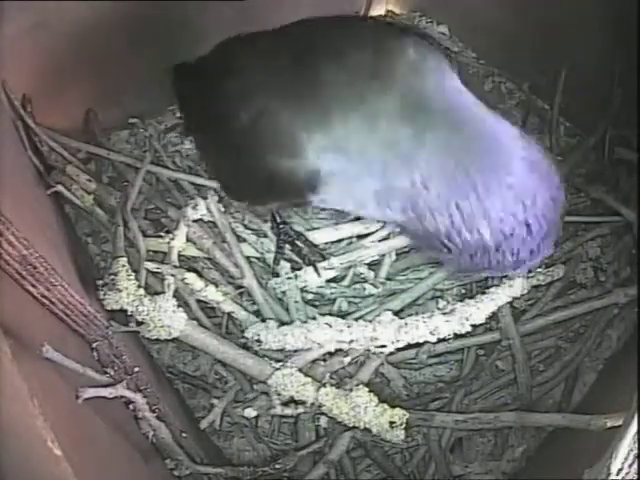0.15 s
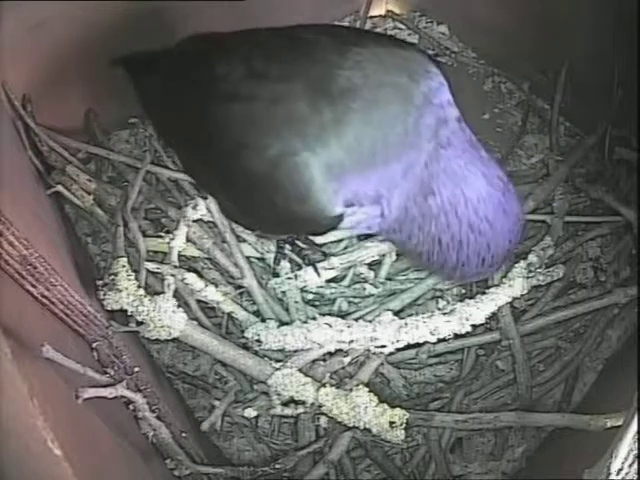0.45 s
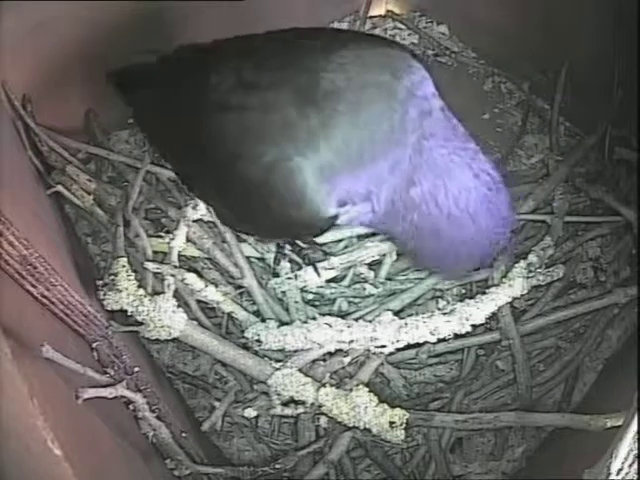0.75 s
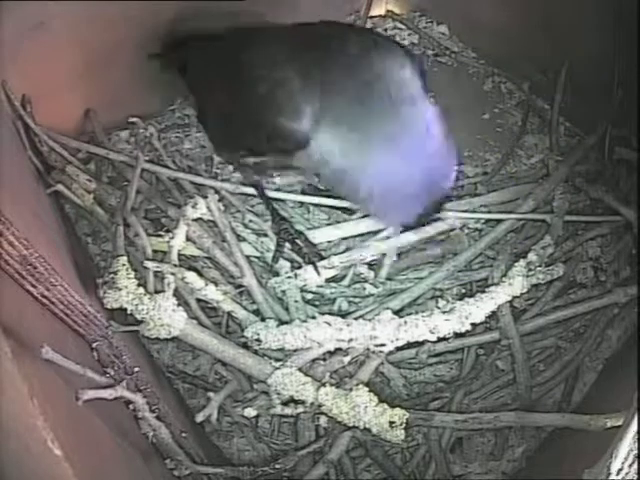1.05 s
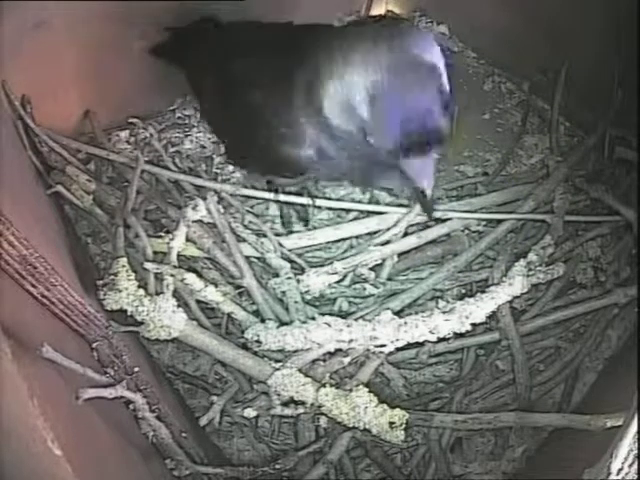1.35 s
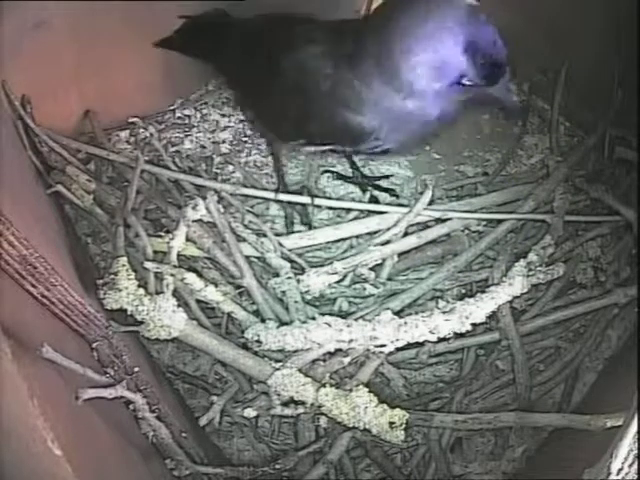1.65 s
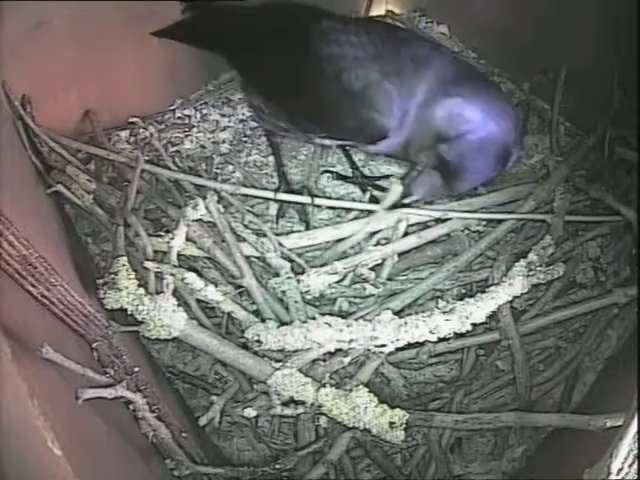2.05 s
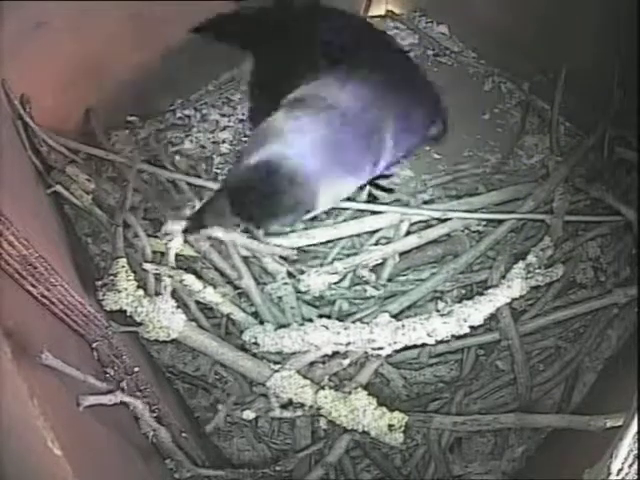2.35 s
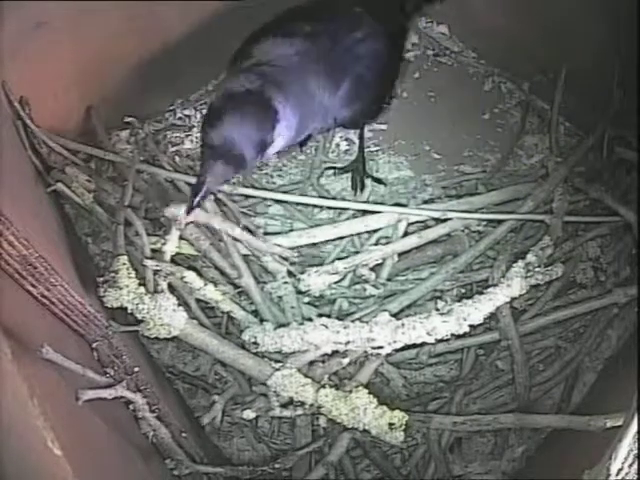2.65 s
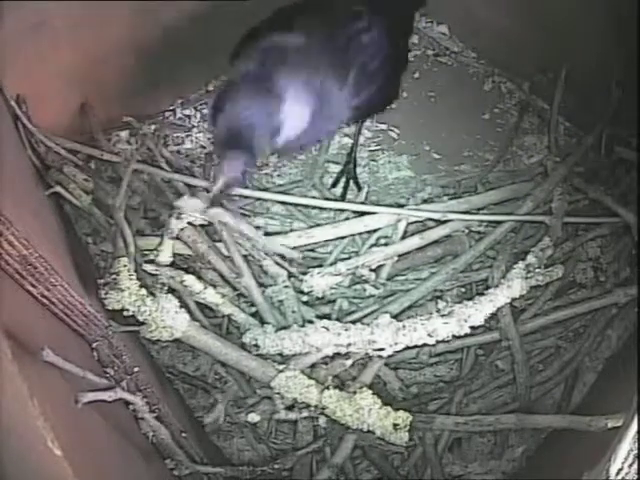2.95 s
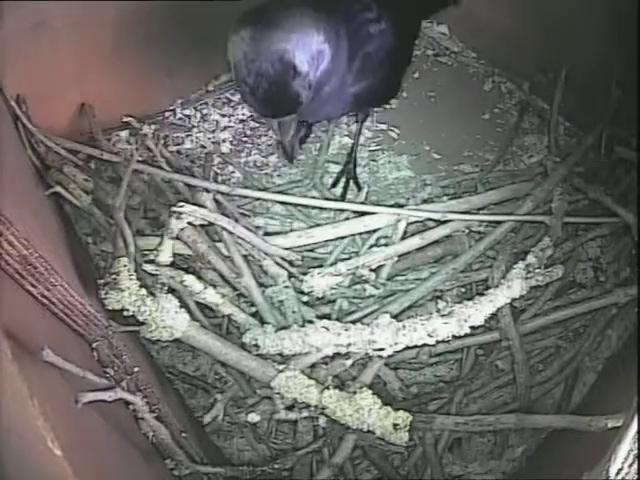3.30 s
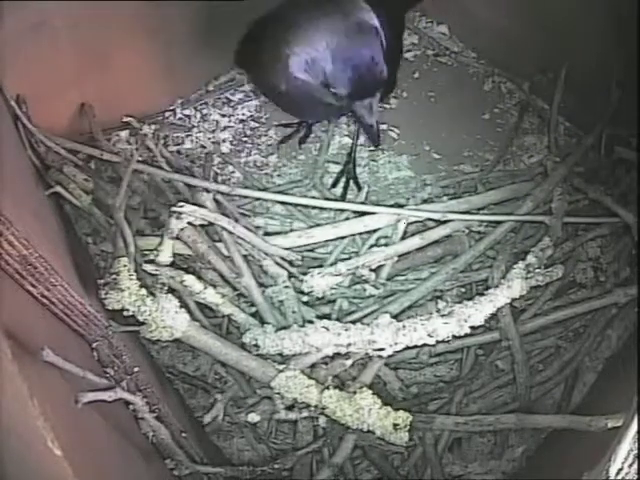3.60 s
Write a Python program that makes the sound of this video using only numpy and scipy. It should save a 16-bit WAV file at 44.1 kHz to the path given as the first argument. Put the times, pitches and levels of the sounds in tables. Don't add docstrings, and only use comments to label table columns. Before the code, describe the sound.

A bird shifts dry twigs in a wooden nest box, with clicks and knocks over a low hum

```python
import sys
import numpy as np
from scipy import signal
from scipy.fft import rfft, irfft
from scipy.io import wavfile
from scipy.ndimage import uniform_filter1d

SR = 44100
rng = np.random.default_rng(int(sys.argv[2]) if len(sys.argv) > 2 else 0)


def persist_wave(psi):
    counts = np.round(np.clip(psi, -1, 1) * 32767).astype(np.int16)
    wavfile.write(sys.argv[1], SR, np.atleast_2d(counts).T)


def amplitude_ratio(level_db):
    exponent = np.asarray(level_db, float) / 20
    return 10 ** exponent


N = 164493

HUM_HZ = 55.333
KINK_RAD = 1.135

# pitch in Hz, level in dB, t60 in seconds.
BOX = [(110, -8, .06), (220, -9.5, .05), (328, 9.5, 0.12), (480, 5, 0.11), (659, 3.5, 0.048),
       (808, -8, 0.19), (975, -2.5, 0.017), (1140, -1.5, 0.024), (1404, -5, 0.015), (1605, -7, 0.031),
       (1837, -4, 0.029), (2090, -8.5, 0.066), (2700, -17, 0.003)]
# frequency in Hz, level in dB per Hz.
CRACKLE = [(1000, -2.5), (2200, 1.5), (3200, -5), (4500, -7.5), (6200, -1.5), (7700, -4.5), (8800, -15)]


def rms_one(x):
    return x / np.sqrt(np.mean(x ** 2) + 1e-20)


def colour(x, points):
    hz, db = np.transpose(points)
    f = np.fft.rfftfreq(len(x), 1 / SR)
    gain = amplitude_ratio(np.interp(np.log(f + 1), np.log(hz), db))
    return irfft(rfft(x) * gain, len(x))


def drift(rate):
    points_per_s = 60
    count = int(N / SR * points_per_s) + 2
    smooth = uniform_filter1d(rng.standard_normal(count), max(1, int(30 / rate)))
    return np.interp(np.arange(N) / SR * points_per_s, np.arange(count), rms_one(smooth))


def ring(x, hz, t60):
    r = amplitude_ratio(-60 / (t60 * SR))
    w = 2 * np.pi * hz / SR
    gain = np.sin(w) * np.sqrt(2 * (1 - r * r))
    return signal.lfilter([0, gain], [1, -2 * r * np.cos(w), r * r], x + 1e-18)


def stroke(s, length, attack, release):
    t = np.arange(N) / SR - s
    return np.clip(t / attack, 0, 1) * np.exp(-np.maximum(t - length, 0) / release)


def air():
    # frequency in Hz, level in dB per Hz.
    air_colour = [(75, -0.5), (105, -9), (140, -11), (350, -25.5), (520, -27.5), (2100, -36.5), (2600, -43),
                  (8400, -49)]
    air_db, boxed_db, patchy_db = -52, -70.5, 3.5
    rumble_cut = signal.butter(2, 45, "high", fs=SR, output="sos")
    outside = rms_one(colour(signal.sosfilt(rumble_cut, rng.standard_normal(N)), air_colour))
    white = rng.standard_normal(N)
    boxed = np.zeros(N)
    for k, (hz, db, t60) in enumerate(BOX[3:]):
        patchy = amplitude_ratio(db + patchy_db * drift(15))
        boxed += (-1) ** k * patchy * ring(white, hz, t60)
    return amplitude_ratio(air_db) * outside + amplitude_ratio(boxed_db) * rms_one(boxed)


def cycle():
    repeats = [.10522, 2.58728]
    repeat_len_s, start_rad = .00803, -.49
    t = np.arange(N) / SR
    return start_rad + 2 * np.pi * HUM_HZ * (t - repeat_len_s * np.searchsorted(repeats, t))


def hum():
    # multiple of the supply frequency, peak level in dB.
    partials = [(2, -53), (3, -37), (4, -56.5), (5, -46), (6, -67.5), (7, -64.5), (8, -74.5), (9, -60),
                (10, -95), (11, -68.5), (12, -79.5), (13, -68), (14, -78.5), (15, -69.5), (17, -75),
                (18, -87.5), (19, -75), (21, -82.5), (23, -76), (27, -86), (31, -80)]
    core_lead = {1: 0, 2: 1.55, 3: .6}
    turn = cycle()
    out = amplitude_ratio(-25.3) * np.cos(turn)
    for k, db in partials:
        k = round(k)
        lead = core_lead.get(k, np.pi * k - KINK_RAD * k)
        out = out + amplitude_ratio(db) * np.cos(k * turn + lead)
    return out


def sparks():
    level_db, spread_db, decay_s = -67, 3.5, .0008
    turns = (cycle() - np.pi - KINK_RAD + 0.24) / (2 * np.pi) + 2
    size = amplitude_ratio(level_db + spread_db * rng.standard_normal(int(N / SR * HUM_HZ) + 10))
    fall = np.exp(-(turns % 1) / HUM_HZ / decay_s)
    return size[turns.astype(int)] * fall * rms_one(colour(rng.standard_normal(N), CRACKLE))


def tones(rows, width_t60, soft_s):
    t, out = np.arange(N) / SR, 0
    for s, db, length, hz in rows:
        sine = np.sin(2 * np.pi * hz * t)
        rough = ring(rng.standard_normal(N), hz, width_t60)
        out = out + amplitude_ratio(db) * stroke(s, length, soft_s, soft_s / 2) * (1.2 * sine + .2 * rough)
    return out


def whistles():
    # start in seconds, level in dB, length in seconds, pitch in Hz.
    calls = [
        (1.84, -84, .07, 4285),
        (2.24, -78.5, .1, 4277),
    ]
    return tones(calls, .1, .04)


def creaks():
    # start in seconds, level in dB, length in seconds, pitch in Hz.
    bends = [
        (2.987, -49.5, .028, 785),
        (3.105, -60, .025, 800),
        (3.138, -57, .018, 810),
        (3.16, -54, .02, 810),
        (.33, -74, .09, 1370),
    ]
    return tones(bends, .08, .012)


def damped_modes(rows):
    contact_cycles = 1.2
    age, out = np.arange(SR // 4) / SR, np.zeros(N)
    for s, db, hz, t60 in rows:
        level = amplitude_ratio(db - 60 * age / t60) * np.clip(age * hz / contact_cycles, 0, 1)
        start = int(s * SR)
        out[start:start + len(age)] += level * np.sin(2 * np.pi * hz * age + rng.uniform(0, 2 * np.pi))
    return out


def thumps():
    # start in seconds, peak level in dB, pitch in Hz, t60 in seconds.
    landings = [(.485, -61, 110, 0.1), (1.111, -58, 110, 0.1), (1.111, -40.5, 224, 0.1),
                (1.456, -47, 331, 0.14), (1.715, -37.5, 109, 0.13), (1.717, -34.5, 206, .08),
                (2.67, -31.5, 110, 0.15), (2.668, -28.5, 224, 0.084), (2.67, -31, 368, 0.048),
                (2.892, -31, 110, 0.14), (2.898, -35, 220, 0.12)]
    return damped_modes(landings)


def knocks():
    # start in seconds, peak level in dB, pitch in Hz, t60 in seconds.
    taps = [(.532, -62, 1196, .04), (.807, -42, 656, .06), (.809, -47.5, 1010, .03),
            (.808, -51, 440, 0.073), (1.069, -39.5, 680, 0.049), (1.11, -29.5, 1140, 0.037),
            (1.1105, -33.5, 1500, 0.023), (1.111, -41.5, 2050, 0.024), (1.12, -35.5, 1140, 0.045),
            (1.322, -46.5, 1140, 0.066), (1.338, -41, 1050, 0.024), (1.457, -37, 1054, 0.051),
            (1.467, -45, 1160, 0.085), (1.66, -37.5, 644, 0.037), (2.579, -47.5, 4500, .006),
            (2.637, -42, 1140, 0.031), (2.666, -26, 490, 0.042), (2.677, -36, 650, 0.1),
            (2.674, -30, 480, 0.17), (2.672, -33.5, 767, 0.087), (1.66, -45, 340, .1),
            (2.67, -35, 344, 0.081), (2.828, -33, 684, 0.059), (2.897, -33, 492, 0.065),
            (2.913, -38, 2094, 0.04), (2.954, -35.5, 658, 0.049), (3.247, -60, 1060, .04)]
    return damped_modes(taps)


def ticks():
    # start in seconds, peak level in dB, snap pitch in Hz, wooden part in dB.
    cracks = [(0.4793, -59, 4020, 0), (0.4834, -55.5, 5150, 2), (0.9767, -54, 4490, 3),
              (1.07, -50, 4730, 3), (1.1099, -44, 4640, -2), (1.3974, -55, 4000, 3),
              (1.4137, -39.5, 6770, 0.5), (1.4174, -60, 4420, 0), (1.4561, -46, 4400, 5),
              (1.4604, -47, 4310, 13), (1.6437, -43, 4000, 4), (1.6474, -57, 5760, 1),
              (1.6554, -50, 4460, 5), (1.6614, -45.5, 4030, 7), (1.7095, -51, 4100, 2),
              (1.7184, -46, 4500, 5), (1.723, -37, 4360, -1), (1.7274, -48, 4640, 4),
              (2.1335, -52, 5160, 2), (2.6334, -43, 5700, -1), (2.6389, -38, 4010, 4),
              (2.6504, -52, 4620, 3), (2.6664, -41, 4010, 3), (2.6723, -45, 6210, 8),
              (2.6764, -33, 6220, -3), (2.6874, -43, 4000, 0), (2.6914, -46, 5040, 3),
              (2.7004, -50, 4470, 3), (2.7204, -51, 4710, 1.5), (2.7576, -53, 5290, 9),
              (2.8224, -53, 4500, 3), (2.8275, -49, 4700, 12), (2.8684, -46, 4310, 5.5),
              (2.8734, -45, 4590, 8), (2.8923, -36.5, 4040, -3), (2.8984, -48, 4500, -1),
              (2.9108, -44, 4170, 3), (2.9144, -39, 4540, -1), (2.9184, -46, 4500, 3),
              (2.9577, -53, 4610, 2), (3.1762, -40.5, 4120, 9.5), (3.1814, -55, 4000, 2),
              (3.2084, -52, 4030, 3), (3.2435, -58, 4350, 3), (3.2484, -54, 4580, 3)]
    rise_s, fall_s = 0.00061, 0.002
    snap_cycles, snap_db = 24, -6
    wood_hz, wood_t60_s = 1500, 0.0029
    out, age = np.zeros(N), np.arange(SR // 20) / SR
    shape = np.clip(age / rise_s, 0, 1) * np.exp(-age / fall_s)
    for s, db, hz, wood_db in cracks:
        noise = rng.standard_normal(len(age))
        dry_part = rms_one(colour(noise, CRACKLE)) * shape
        snap = amplitude_ratio(snap_db) * ring(noise * shape, hz, snap_cycles / hz)
        wood = amplitude_ratio(wood_db) * ring(noise[::-1] * shape, wood_hz, wood_t60_s)
        start = int(s * SR)
        out[start:start + len(age)] += amplitude_ratio(db - 7) * (dry_part + snap + wood)
    return out


def twigs():
    # start in seconds, level in dB, length in seconds, favoured box pitch in Hz, dry crackle in dB.
    twig_moves = [(0.063, -66.5, 0.038, 1740, -13), (0.323, -76, .01, 1390, -10),
                  (0.48, -57, 0.019, 1600, -17), (0.526, -56.5, 0.02, 1200, -35),
                  (0.652, -62, 0.067, 1010, -27), (0.802, -47.5, 0.017, 664, -30),
                  (0.82, -67.5, 0.036, 660, -21), (1.002, -56.5, 0.021, 1030, -10),
                  (1.067, -47.5, 0.012, 930, -24), (1.076, -53, 0.037, 910, -10.5),
                  (1.106, -45, 0.0056, 1590, -15.5), (1.125, -69.5, 0.015, 1140, -29),
                  (1.145, -56.5, 0.025, 700, -33), (1.307, -58, 0.06, 1090, -11),
                  (1.371, -56.5, 0.055, 940, -15), (1.412, -62, 0.0036, 1800, 18),
                  (1.426, -55.5, 0.021, 890, -15), (1.452, -44.5, 0.023, 1010, -20),
                  (1.505, -61.5, 0.081, 1020, -10), (1.641, -49, 0.0088, 1100, -1.5),
                  (1.653, -60.5, 0.022, 1010, -1), (1.67, -54.5, 0.052, 1010, -39),
                  (1.707, -52, 0.024, 1500, -4), (1.721, -50.5, 0.0072, 1500, -7),
                  (1.74, -58.5, 0.025, 1100, -8.5), (1.81, -56, 0.0082, 995, -11),
                  (2.129, -63, 0.017, 1800, -2.5), (2.482, -59.5, 0.044, 1190, -8),
                  (2.631, -48.5, 0.028, 1740, -6.5), (2.665, -35, 0.016, 1420, -14),
                  (2.683, -44, 0.024, 1450, -30), (2.715, -56.5, 0.014, 1090, -12),
                  (2.757, -62.5, 0.027, 1180, -6), (2.805, -49, 0.059, 940, -19),
                  (2.825, -45, 0.0091, 703, -25), (2.838, -55.5, 0.031, 890, -11),
                  (2.869, -50, 0.036, 1480, -7), (2.891, -46.5, 0.02, 970, -9),
                  (2.91, -43, .011, 1570, -12.5), (2.926, -53.5, 0.016, 950, -14),
                  (2.95, -46.5, 0.023, 770, -17.5), (2.977, -59.5, 0.056, 1000, -8.5),
                  (3.059, -57.5, 0.016, 1090, -30), (3.102, -56.5, 0.099, 980, -13),
                  (3.174, -44, 0.0073, 1700, -22), (3.2, -57, 0.047, 1160, -11),
                  (3.241, -52, 0.017, 1225, -24), (3.26, -71.5, 0.016, 1200, -21)]
    moves = np.array(twig_moves)
    attack_s, lead_s, release_s, sag_db = .0035, .001, 0.0062, -4
    slips_per_s, slip_spread_db = 6000, 2.2
    clump_db, clump_s = 2.2, .004
    favour_oct = .65

    t = np.arange(N) / SR
    shapes = []
    for s, db, length, _, _ in moves:
        level = amplitude_ratio(db + sag_db * np.clip((t - s) / length, 0, 1))
        shapes.append(level * stroke(s - lead_s, length, attack_s, release_s))
    shapes = np.array(shapes)

    sizes = amplitude_ratio(slip_spread_db * np.minimum(rng.exponential(1, (2, N)), 4))
    sizes = sizes * rng.choice([-1, 1], (2, N))
    bunching = uniform_filter1d(np.roll(np.sign(sizes[1]), N // 2), int(clump_s * SR))
    clumps = amplitude_ratio(clump_db * rms_one(bunching))
    slips = rms_one(clumps * sizes * (rng.random(N) < slips_per_s / SR))

    hz, db, t60 = np.transpose(BOX)
    octaves_off = np.log2(hz / moves[:, 3:4])
    share = amplitude_ratio(db) * (.12 + np.exp(-.5 * (octaves_off / favour_oct) ** 2))
    share = share * amplitude_ratio(1.5 * rng.standard_normal(share.shape))
    share = share / np.sqrt((share ** 2).sum(axis=1, keepdims=True))
    drive = share.T @ shapes
    body = np.zeros(N)
    for k in range(len(hz)):
        body += (-1) ** (k // 2) * ring(drive[k] * slips[k % 2], hz[k], t60[k])

    grit = rms_one(colour(.8 * slips[0] + .6 * rng.standard_normal(N), CRACKLE))
    return 1.2 * body + (amplitude_ratio(moves[:, 4]) @ shapes) * grit


def scene():
    background = air() + hum() + sparks() + whistles()
    bird = creaks() + thumps() + knocks() + ticks() + twigs()
    return (background + bird)[None]


def band_limit(x):
    return signal.sosfilt(signal.butter(12, 20000, fs=SR, output="sos"), x)


def record(dry):
    wobble_hz, wobble_s, jitter_s = 1740.07, 2.8e-5, 3e-6
    bend_gain, offset = 1.6e-9, .0021
    t = np.arange(N) / SR
    turn = 2 * np.pi * wobble_hz * t
    saw = sum(np.sin(k * turn) / k for k in range(1, 9)) * 2 / np.pi
    late = t + wobble_s * saw + jitter_s * rng.standard_normal(N)
    x = np.interp(late, t, dry[0])

    bend = -sum(np.cos(k * turn) for k in range(2, 9)) * 2 / np.pi
    smooth = signal.sosfilt(signal.butter(2, 900, fs=SR, output="sos"), dry[0] - dry[0, 0])
    x = x + bend_gain * bend * np.gradient(np.gradient(smooth)) * SR ** 2

    top_cut = signal.cheby2(12, 60, 9320, fs=SR, output="sos")
    x = signal.sosfilt(top_cut, x - x[0]) + x[0] + offset
    return band_limit(x[None])


dry = scene()
out = record(dry)
persist_wave(out)
```